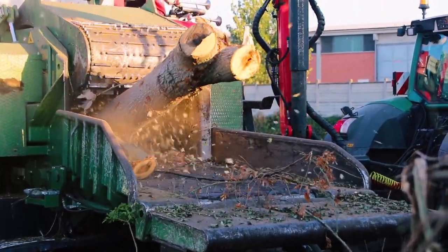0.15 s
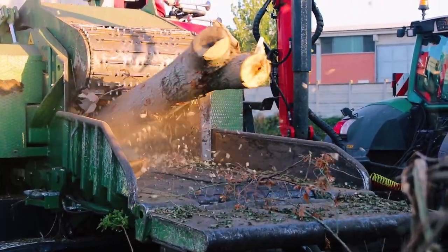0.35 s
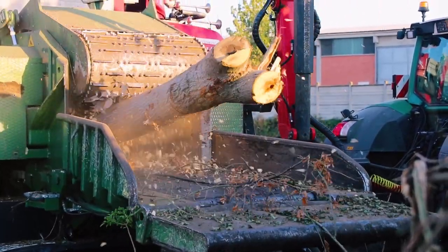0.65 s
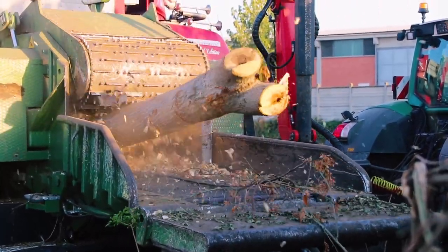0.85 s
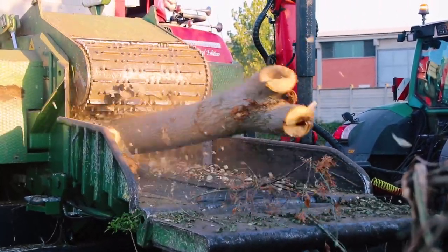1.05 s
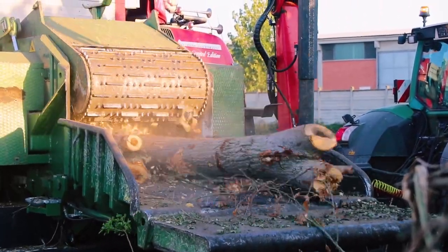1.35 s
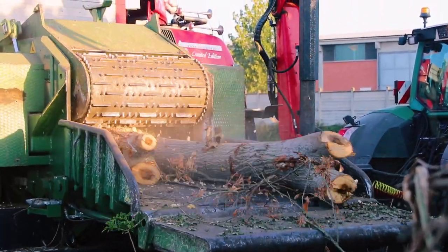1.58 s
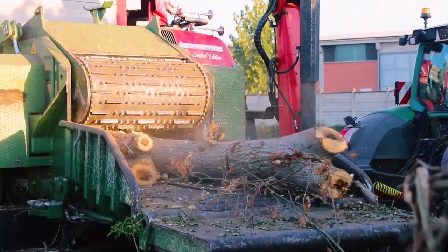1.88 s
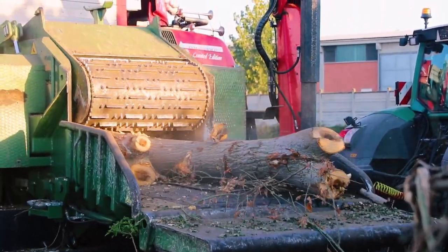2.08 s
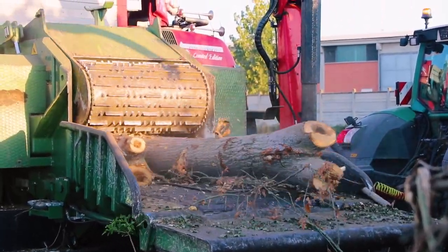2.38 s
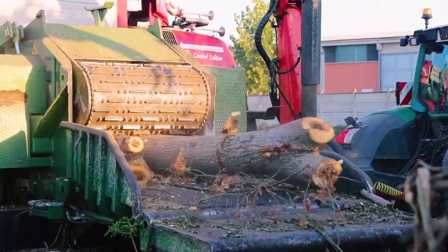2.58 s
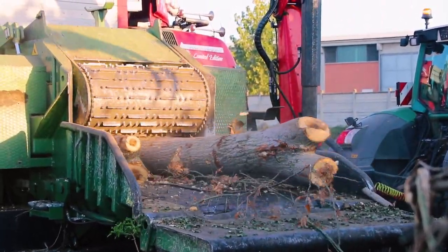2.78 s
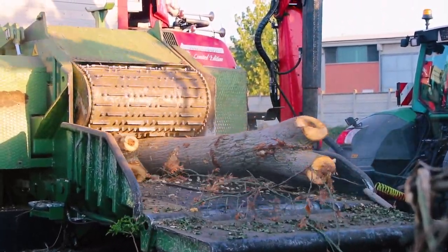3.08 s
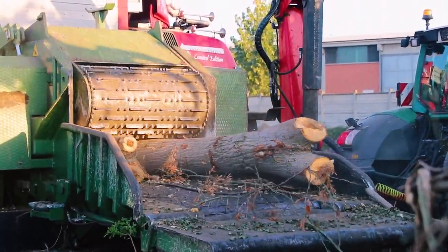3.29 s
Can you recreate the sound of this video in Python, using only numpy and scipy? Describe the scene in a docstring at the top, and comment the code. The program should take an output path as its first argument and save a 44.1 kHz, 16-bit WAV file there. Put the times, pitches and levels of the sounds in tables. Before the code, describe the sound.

Wood chipper pounding and tearing logs in rapid crunching thuds over a steady machine roar outdoors.

```python
"""Outdoors, a drum chipper eats two logs. About eight times a second a staggered group of knives bites the wood.
Each bite is splinter noise in bursts (crack, woody knock, thud) over the ringing modes of housing and log.
Between the logs the blower's paddles clatter: strikes and sprays of chips ring the chute's resonances.
Underneath, patchy noise makes the roar of drum, blower and loose chips, and a wavering sine the engine."""
import sys
import numpy as np
from scipy import signal
from scipy.fft import rfft, irfft
from scipy.io import wavfile

SR = 44100
rng = np.random.default_rng(int(sys.argv[2]) if len(sys.argv) > 2 else 0)


def master_out(mix):
    """Clip the mix to full scale and print it as 16-bit PCM to the path in sys.argv[1]."""
    frames = np.transpose(np.atleast_2d(mix))
    ceiling = np.clip(frames, -1, 1)
    pcm = np.round(ceiling * 32767).astype(np.int16)
    wavfile.write(sys.argv[1], SR, pcm)


N = 151704


def from_db(db):
    """dB to amplitude gain."""
    return 10 ** (np.asarray(db) / 20)


def rms_one(x):
    """Scale to rms 1."""
    return x / np.sqrt(np.mean(x ** 2) + 1e-20)


def in_time(rows):
    """Columns of a time table, drawn as straight lines sample by sample."""
    s, *columns = np.transpose(rows)
    return [np.interp(np.arange(N) / SR, s, column) for column in columns]


def at_hz(points, hz):
    """Read a spectrum table at hz, straight lines over log frequency."""
    table = np.array(points)
    return np.interp(np.log(hz), np.log(table[:, 0]), table[:, 1])


def drift(rate):
    """Slow random wander, spread 1: noise through a two-pole lowpass about rate Hz wide."""
    r = np.exp(-80 * np.pi * rate / SR)  # computed at every 40th sample
    noise = rng.standard_normal(N // 40 + 2002)
    slow = signal.lfilter([1], [1, -2 * r, r * r], noise)[2000:]
    return np.interp(np.arange(N) / 40, np.arange(len(slow)), rms_one(slow))


def bursts(s, db, attack, decay):
    """Envelope of overlapping bursts, added as power; each swells, tops out at its dB and dies."""
    power = np.zeros(N)
    start = np.clip(((s - attack) * SR).astype(int), 0, N - 1)
    np.add.at(power, start, from_db(db) ** 2)
    t = np.arange(int(.25 * SR)) / SR
    shape = (1 - np.exp(-t / attack)) ** 3 * np.exp(-2 * t / decay)
    return np.sqrt(np.abs(signal.fftconvolve(power, shape / shape.max())[:N]))


def resonate(x, hz, width):
    """One two-pole resonance, gain 1 on top."""
    r = np.exp(-np.pi * width / SR)
    poles = [1, -2 * r * np.cos(2 * np.pi * hz / SR), r * r]
    return signal.lfilter(np.array([1, 0, -1]) * (1 - r * r) / 2, poles, x)


# Stereo lean: f/Hz, left minus right level/dB
LEAN = [(600, 0), (1410, -2), (3100, -5.5), (6800, -1), (9500, -1.5), (12500, 3.5)]
# Stereo difference, relative to the shared sound: f/Hz, level/dB
UNLIKE = [(60, -75), (250, -24), (1000, -16), (4000, -6.5), (12000, 1.5)]


def pair(mid, side, hz):
    """Left and right from a shared and a differing noise."""
    lean = at_hz(LEAN, hz) / 2
    difference = from_db(at_hz(UNLIKE, hz)) * side * [[1], [-1]]
    return from_db([[lean], [-lean]]) * (mid + difference)


def bank(white, gain):
    """Stereo bands about 0.4 octave wide, each with gain(hz) over time; neighbours use separate noises."""
    out, edges = 0, np.geomspace(22, 16500, num=24)
    for k, (low, high) in enumerate(zip(edges, edges[1:])):
        centre = np.sqrt(low * high)
        band = signal.butter(2, [low, high], "band", fs=SR, output="sos")
        mid, side = signal.sosfilt(band, white[k % 2])
        out = out + gain(centre) * pair(mid, side, centre)
    return out


SPLINTER_SPREAD_DB = 2.5


def splinters(rate):
    """Random snaps of uneven size, rate per second, for tearing or tumbling wood."""
    shape = (2, 2, N)
    unevenness = from_db(SPLINTER_SPREAD_DB * np.minimum(rng.exponential(1, shape), 3))
    sizes = unevenness * rng.standard_normal(shape)
    return rms_one(sizes * (rng.random(N) < rate / SR))


# Roar colour, before scaling to rms 1: f/Hz, relative level/dB per Hz
ROAR = [(33, -15), (50, -10.5), (113, -4), (267, 3.5), (741, -4), (1050, -2), (3500, -8), (5500, -20),
        (10300, -26), (15500, -47)]
# Roar over time: t/s, level/dB, extra treble before scaling/dB
ROAR_LEVEL = [(0, -20.5, 5), (.9, -24, 3.5), (1.6, -24.5, 2), (1.9, -20.5, 2.5), (2.6, -19.5, -0.5),
              (3.44, -20.5, -1)]
ROAR_PATCHY_DB = 1.5
LOOSE_CHIPS_PER_S, LOOSE_CHIPS_DB = 500, -11.5  # dB relative to the steady noise


def roar():
    """Turbulent drum and blower: broad noise, patchy band by band, with loose chips tumbling in it."""
    level_db, treble_db = in_time(ROAR_LEVEL)
    together = drift(6.6)
    chips = from_db(LOOSE_CHIPS_DB) * splinters(LOOSE_CHIPS_PER_S)
    white = rng.standard_normal((2, 2, N)) + chips

    def gain(hz):
        patchy_db = ROAR_PATCHY_DB * (0.93 * together + drift(63))
        return from_db(at_hz(ROAR, hz) + treble_db * (hz > 4500) + patchy_db)

    return from_db(level_db) * rms_one(bank(white, gain))


# Engine firing tone: t/s, f/Hz, mean level around which it wanders/dB
ENGINE = [(0, 82, -38), (1.5, 80.4, -50.5), (2.2, 87.3, -37), (3.44, 82.5, -48)]


def engine():
    """The firing rate as one sine, gliding in pitch and wandering in level."""
    hz, hum_db = in_time(ENGINE)
    return from_db(hum_db + 2 * drift(11.0)) * np.sin(2 * np.pi * np.cumsum(hz) / SR)


# Knife bites, levels relative within each column: t/s, crack level/dB, thud level/dB, knock level/dB
KNIVES = [(0.0498, -4.5, -16.5, -15), (0.0724, -3.5, -13, -15), (0.0972, -9.5, -20, -15.5),
          (0.165, -6.5, -35, -32), (0.185, -3, -22, -13), (0.2098, -6.5, -16, -25), (0.282, -12, -36, -44),
          (0.3018, -2.5, -17.5, -15.5), (0.3281, -5, -12, -9), (0.4223, -2, -14.5, -16.5),
          (0.4504, -8, -13.5, -16), (0.5419, -5.5, -22, -17.5), (0.5645, -6.5, -14, -16),
          (0.5899, -8.5, -10.5, -15), (0.6598, -11, -26, -25), (0.6815, -4, -17, -15.5),
          (0.7092, -16, -10.5, -10), (0.784, -12.5, -24, -50), (0.8053, -6, -12.5, -16),
          (0.8299, -12, -17, -12.5), (0.904, -11.5, -21, -22), (0.9297, -3.5, -11, -17.5),
          (0.955, -22, -32, -12.5), (1.029, -6, -18, -47), (1.0498, -6, -14, -16.5),
          (1.0777, -13, -13, -16), (1.1887, -14.5, -28, -26), (1.2118, -11, -30, -30),
          (1.3081, -8.5, -21.5, -20), (1.3388, -10.5, -21, -17), (1.407, -15, -19, -29),
          (1.438, -7.5, -32, -11.5), (1.4573, -6, -9, -17), (2.2624, -12, -13, -17),
          (2.2907, -9, -15.5, -12), (2.3755, -14, -16, -12.5), (2.3907, -3.5, -13, -9.5),
          (2.4089, -7.5, -6.5, -8.5), (2.5011, -5.5, -10, -19), (2.5195, -7.5, -7.5, -8.5),
          (2.608, -19, -34, -16), (2.6238, -5.5, -14, -15), (2.6391, -5, -10.5, -7),
          (2.7167, -17, -11.5, -36), (2.747, -2.5, -17.5, -15), (2.7687, -23, -12.5, -6),
          (2.851, -14, -17, -16), (2.8684, -7.5, -36, -20), (2.893, -13, -5.5, -8), (2.997, -5, -25, -17.5),
          (3.0179, -14, -8, -9), (3.124, -7.5, -13.5, -18), (3.146, -12, -5, -10.5), (3.2504, -5, -13, -38),
          (3.2724, -13, -6.5, -5.5), (3.3509, -16, -19.5, -31), (3.3786, -7, -25, -22),
          (3.3985, -25, -5, -6)]
# Treble at a group's first knife: t/s, relative level/dB, loss within the group/dB per s
TREBLE = [(0, -14, 400), (1.0, -23.5, 420), (1.25, -37, 150), (1.45, -23.5, 200), (2.3, -20.5, 56),
          (2.6, -33, 100), (3.44, -56.5, 50)]
# Thud, knock, crack and treble of a bite: centre f/Hz, attack/s, decay/s, gain/dB
PARTS = [(280, 0.011, 0.018, -8.5), (1090, 0.01, 0.012, -1.5), (3180, 0.0062, 0.012, 0.5),
         (8850, 0.0022, 0.0062, -8)]
CHIP_TAIL_S, CHIP_TAIL_DB = 0.024, -7.5  # decay; level below each part


def bite_envelopes(s, since):
    """Each part of a bite bursts at its own speed, then flying chips leave a longer tail."""
    _, crack, thud, knock = np.transpose(KNIVES)
    at = (s * SR).astype(int)
    treble_db, loss = in_time(TREBLE)
    treble = treble_db[at] - loss[at] * since
    envelopes = []
    for db, (_, attack, decay, gain_db) in zip((thud, knock, crack, treble), PARTS):
        level_db = db - db.mean() + gain_db
        bite = bursts(s, level_db, attack, decay)
        tail = bursts(s, level_db + CHIP_TAIL_DB, decay, CHIP_TAIL_S)
        envelopes.append(np.hypot(bite, tail))
    return envelopes


CRACKS_PER_S, CRACK_CYCLES = 700, 23  # cycles to fall 60 dB


def cracks(gain):
    """Single splits of wood, each ringing briefly at one of 24 pitches."""
    pitches = np.geomspace(550, 4600, num=24)
    dealt = rng.integers(0, len(pitches), N)
    sizes = rng.standard_normal((2, N)) * (rng.random(N) < CRACKS_PER_S / SR)
    total = 0
    for k, hz in enumerate(pitches):
        width = np.log(1000) / np.pi * hz / CRACK_CYCLES
        hits = gain(hz) * sizes * (dealt == k) + 1e-18
        total = total + pair(*resonate(hits, hz, width), hz) / np.sqrt(hz)
    return rms_one(total)


# Colour of the torn wood: f/Hz, relative level/dB per Hz
BITE = [(45, -33), (250, 0), (578, -11.5), (1410, -10), (3600, -14.5), (5200, -19.5), (10500, -29.5),
        (15500, -45)]
BITE_DB, BITE_PATCHY_DB, SPLINTERS_PER_S, CRACKS_DB = -0.5, 1.5, 6000, -26
# The splitting wood's ring drops from knife to knife: start f/Hz, fall/s, log scatter, width/octaves, boost/dB
SPLIT_HZ, SPLIT_FALL_PER_S, SPLIT_SCATTER, SPLIT_OCTAVES, SPLIT_DB = 3610, 9.0, 0.066, 0.28, 3


def tearing_wood(s, since, parts):
    """Splinter noise and single cracks under the bite envelopes, blended over pitch."""
    scatter = SPLIT_SCATTER * rng.standard_normal(len(s))
    knife_hz = SPLIT_HZ * np.exp(scatter - SPLIT_FALL_PER_S * since)
    # the ring takes each knife's pitch 200 samples ahead of the bite
    latest = np.searchsorted((s * SR).astype(int), np.arange(N) + 200) - 1
    split_hz = knife_hz[np.maximum(latest, 0)]
    centres = [part[0] for part in PARTS]

    def gain(hz):
        shares = [at_hz(list(zip(centres, row)), hz) for row in np.eye(len(PARTS))]
        envelope = sum(share * part for share, part in zip(shares, parts))
        ring_db = SPLIT_DB * np.exp(-(np.log2(hz / split_hz) / SPLIT_OCTAVES) ** 2)
        return from_db(at_hz(BITE, hz) + BITE_PATCHY_DB * drift(11.4) + ring_db) * envelope

    tear = from_db(BITE_DB) * bank(splinters(SPLINTERS_PER_S), gain)
    return tear + from_db(CRACKS_DB) * cracks(gain)


# Housing and log modes, relative levels: f/Hz, level with the first log/dB,
# level as the second enters/dB, level once it is gripped/dB, time to fall 60 dB/s
HOUSING = [(132.9, 0, -5.5, -6.5, 0.23), (173.8, -6.5, -7.5, -3, 0.2), (216, 1, -4, -15, 0.35),
           (249.4, -2.5, 9, -6, 0.22), (277.3, -5, -6.5, -3, 0.34), (322.5, -7, -16, -13, 0.64),
           (366.6, -31, -3, -3.5, 0.32), (423.3, -8, -14, -3.5, 0.12)]
# Feed: first log gone t/s, second enters t/s, starts to be gripped t/s, gripped t/s
FEED_S = [1.1, 1.3, 2.6, 3.2]
HOUSING_DB = 2.5
PUSH_STEADY, PUSH_LAG_S = 0.83, 0.007  # gain of the clean blow; its lag behind the crack


def housing(s, thud_envelope):
    """A clean blow plus rough noise pushes the modes of housing and log, which ring on as a thud."""
    thud = np.transpose(KNIVES)[2]
    blows = np.zeros(N)
    at = (s * SR).astype(int) + int(PUSH_LAG_S * SR)
    blows[at] = from_db(thud - thud.mean()) * PUSH_STEADY * np.sqrt(SR * PARTS[0][2])
    pushes = blows + thud_envelope * rng.standard_normal((len(HOUSING), N))
    boom = 0
    for push, (hz, first_db, enters_db, gripped_db, t60) in zip(pushes, HOUSING):
        feed_db = np.interp(np.arange(N) / SR, FEED_S, [first_db, enters_db, enters_db, gripped_db])
        boom = boom + resonate(push * from_db(feed_db), hz, np.log(1000) / np.pi / t60)
    return from_db(HOUSING_DB) * boom


GROUP_GAP_S = .05  # a longer pause starts a new group of knives


def knives():
    """Each knife tears the wood and thuds in the housing, in staggered groups."""
    s = np.transpose(KNIVES)[0]
    first_of_group = np.diff(s, prepend=-1) > GROUP_GAP_S
    since = s - np.maximum.accumulate(s * first_of_group)
    parts = bite_envelopes(s, since)
    return tearing_wood(s, since, parts) + housing(s, parts[0])


# Paddle throws, before the chute: t/s, relative level/dB
THROWS = [(1.232, -41), (1.269, -30.5), (1.387, -30), (1.501, -26.5), (1.584, -33.5), (1.619, -33.5),
          (1.662, -30.5), (1.703, -27), (1.74, -28), (1.774, -28.5), (1.814, -29), (1.85, -23.5),
          (1.894, -26), (1.928, -24.5), (1.963, -25.5), (2.007, -25.5), (2.046, -24), (2.083, -25),
          (2.118, -20), (2.158, -27), (2.195, -21.5), (2.232, -22.5), (2.302, -22.5), (2.342, -21)]
# Chute resonances: f/Hz, width/Hz, relative level/dB
CHUTE = [(353, 45, -6), (909, 84, 2), (1800, 460, -0.5), (2850, 44, -6.5), (3820, 160, -5.5),
         (4400, 790, -0.5), (1980, 3500, -11.5)]
PADDLE_ATTACK_S, PADDLE_DECAY_S = 0.0014, 0.009
PADDLE_STRIKE_DB = 13.5  # strike above its throw's spray
PADDLE_GAP_S, PADDLE_LOADED_DB = 0.029, -29.5  # even sprays, without strikes, under the second log


def paddles():
    """Each listed throw, a strike and a spray of chips, rings all the chute's resonances at once."""
    s, db = np.transpose(THROWS)
    later = np.arange(s[-1] + PADDLE_GAP_S, N / SR, PADDLE_GAP_S)
    spray_db = np.r_[db, PADDLE_LOADED_DB + 0 * later]
    spray = bursts(np.r_[s, later], spray_db, PADDLE_ATTACK_S, PADDLE_DECAY_S)
    strike = np.zeros(N)
    strike[(s * SR).astype(int)] = from_db(db + PADDLE_STRIKE_DB)
    push = spray * rng.standard_normal((2, N)) + strike * [[1], [0]]  # strikes are shared by both sides
    clatter = 0
    for j, (hz, width, mode_db) in enumerate(CHUTE):
        level = (-1) ** j * from_db(mode_db) * np.sqrt(SR / width / 2)  # evens out noise power over width
        clatter = clatter + level * pair(*resonate(push, hz, width), hz)
    return clatter


RIGHT_LAG_S, LAG_FADES_HZ = .00004, 9700


def scene():
    """Everything reaches the right microphone a little later, less so in the treble."""
    left, right = roar() + engine() + knives() + paddles()
    hz = np.fft.rfftfreq(N, 1 / SR)
    late = np.exp(-2j * np.pi * hz * RIGHT_LAG_S / (1 + (hz / LAG_FADES_HZ) ** 2))
    return np.array([left, irfft(rfft(right) * late, N)])


# Microphone colour: f/Hz, width/Hz, level at the centre/dB
MIC = [(4935, 790, -4.5), (9960, 980, 5.5), (5640, 430, 4.5)]
TOP, CUTOFF_HZ = 1.1, 15950  # ceiling of the rounding; edge of the top cut


def record(dry):
    """Resonances colour the microphone; peaks are rounded, the top is cut."""
    for hz, width, db in MIC:
        dry = dry + (from_db(db) - 1) * resonate(dry, hz, width)
    rounded = np.clip(TOP * np.tanh(dry / TOP), -1, 1)
    top_cut = signal.cheby2(18, 70, CUTOFF_HZ, fs=SR, output="sos")
    return signal.sosfilt(top_cut, rounded)


dry = scene()
out = record(dry)
master_out(out)
```